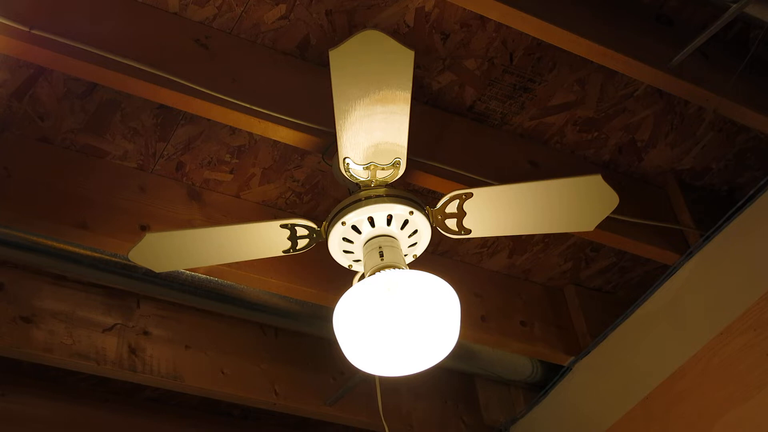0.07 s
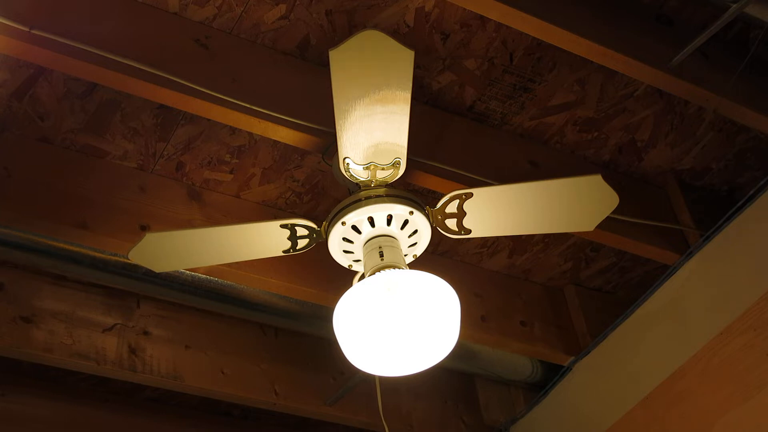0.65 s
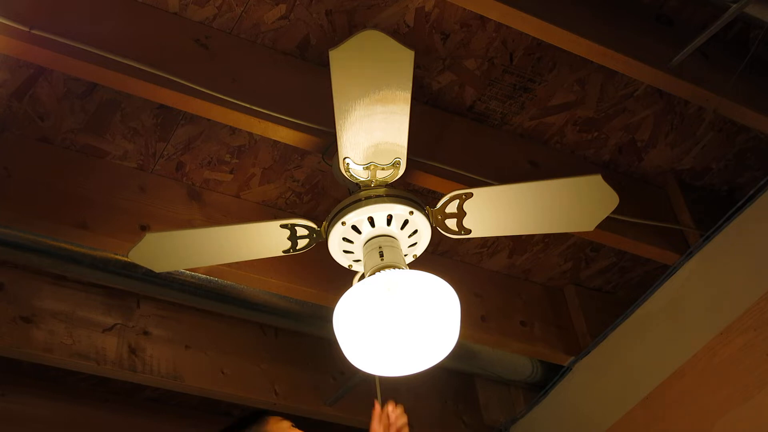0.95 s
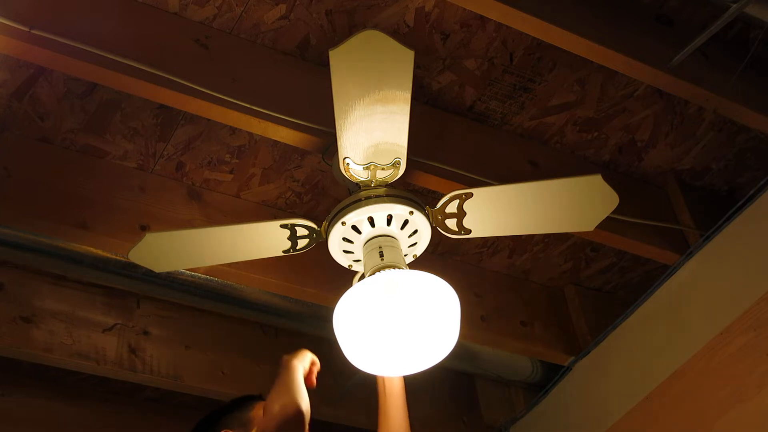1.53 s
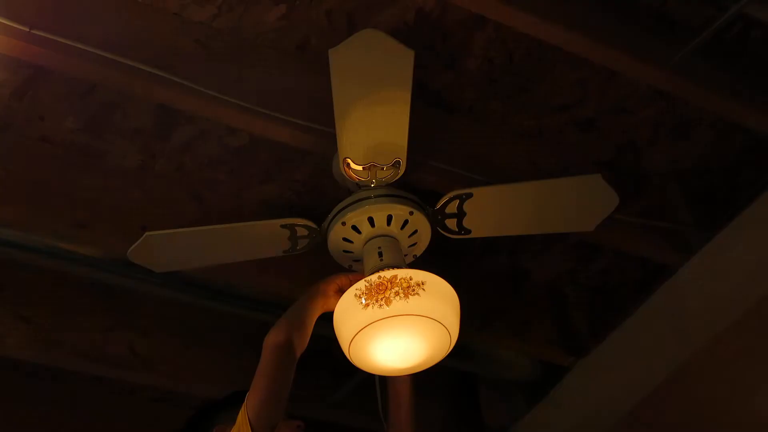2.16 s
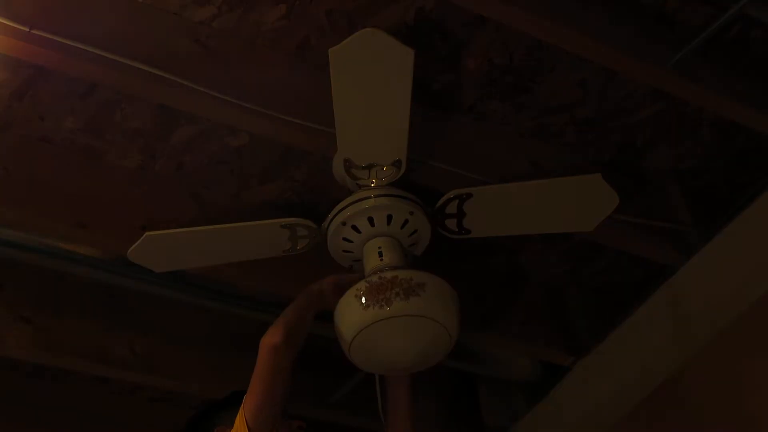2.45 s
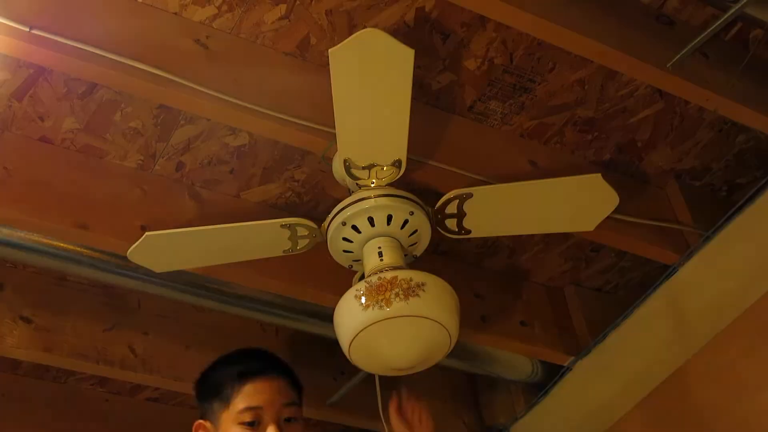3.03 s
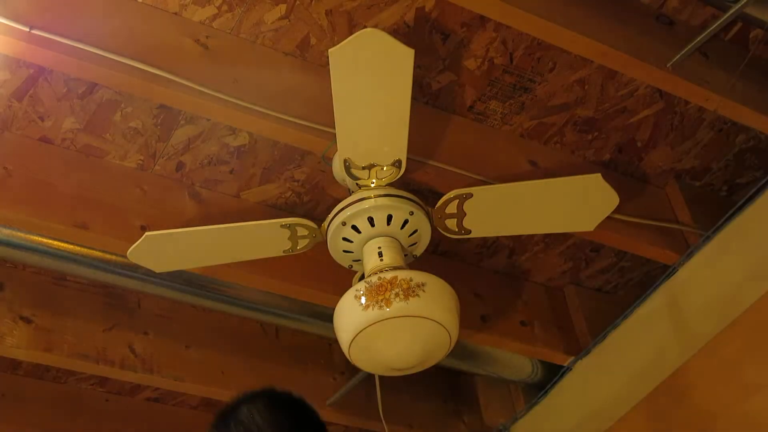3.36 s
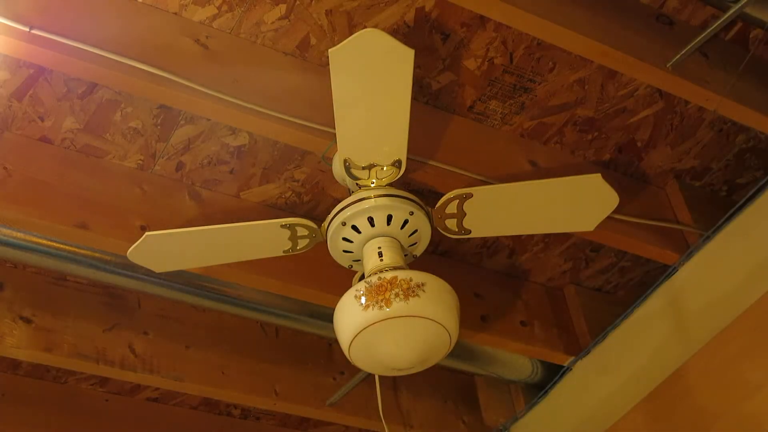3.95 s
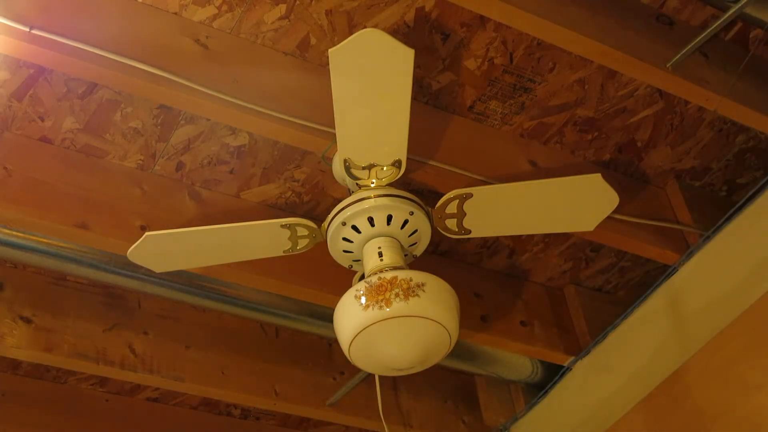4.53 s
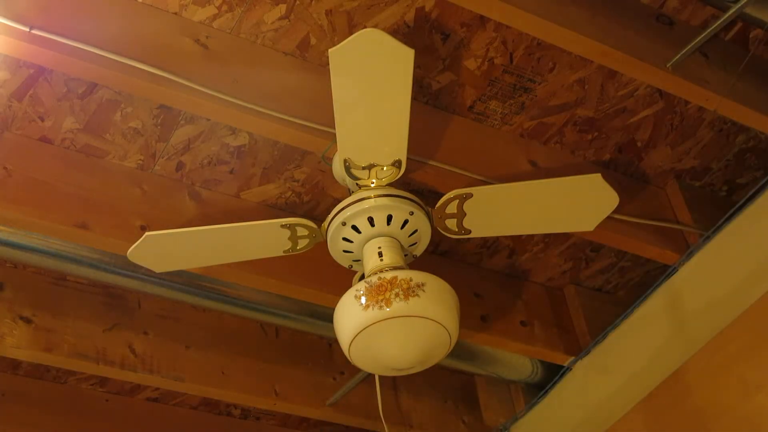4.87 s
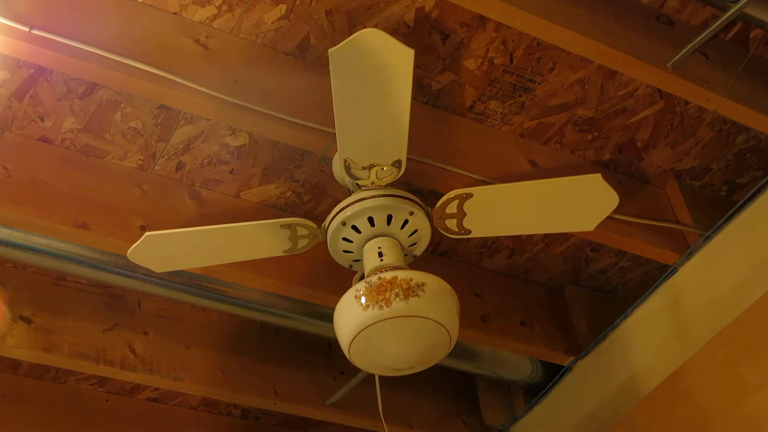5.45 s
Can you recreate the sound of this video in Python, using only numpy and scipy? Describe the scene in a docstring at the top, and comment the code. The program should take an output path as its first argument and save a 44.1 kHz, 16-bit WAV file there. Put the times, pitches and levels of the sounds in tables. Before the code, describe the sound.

In a quiet room, a person moves about with soft floor thumps and rustles of clothes and soles. A bead chain jingles faintly, then the pull switch of a ceiling fan light snaps in and springs back, two sharp clicks with a brief metallic ring. The released chain rattles. More shuffling and dull knocks follow, while a camera lens close to the microphone ticks in quick small steps over low rumble and hiss.

```python
"""Pull-chain switch of a ceiling fan light in a bare-joisted room: it snaps in and springs back,
each contact a crack that rings the metal fitting. The chain rattles as its beads collide.
Before and after, a person moves about: soft knocks boom in the floor, cloth and soles rustle.
The lens iris of a camera close by ticks in small steps. Rumble, air and hiss lie underneath."""
import sys
import numpy as np
from scipy import signal
from scipy.fft import rfft, irfft, next_fast_len
from scipy.io import wavfile
from scipy.ndimage import map_coordinates

SR = 44100
rng = np.random.default_rng(int(sys.argv[2]) if len(sys.argv) > 2 else 0)


def dump_mix(stems):
    """Bounce the given channels to the path in sys.argv[1] as a 16-bit WAV at rate SR."""
    frames = np.atleast_2d(stems).T  # one column per channel
    limited = np.clip(frames, -1, 1)  # hard clip at full scale
    pcm = np.round(limited * 32767).astype(np.int16)
    wavfile.write(sys.argv[1], SR, pcm)


N = 246959
T = np.arange(round(0.6 * SR)) / SR  # time within one event, s

# Levels in all tables are relative.
# background spectra (rumble, air with hiss, antiphase air): f/Hz, level/dB
RUMBLE_SPECTRUM = [(20, -40), (45, -7), (70, -4.5), (100, 1), (150, -2), (275, -1.5), (600, -44)]
AIR_SPECTRUM = [(50, -40), (100, -16.5), (170, -4), (370, 1), (700, -2), (1360, -6), (2000, -7.5),
                (3000, -13), (6000, -12.5), (9000, -17.5), (15800, -22.5)]
WIDE_SPECTRUM = [(50, -60), (140, -26), (250, -8), (450, 0), (900, -2), (1500, -9), (2600, -24),
                 (6000, -50)]
# sliding strokes: t/s, length/s, rub level/dB, hiss level/dB
STROKES = [(.079, 0.043, -46, -59.5), (0.137, .18, -57, -57), (.664, 0.045, -44.5, -52.5),
           (0.906, 0.098, -48, -53), (2.709, 0.058, -51.5, -51.5), (3.201, 0.074, -48, -52.5),
           (3.427, 0.12, -46.5, -48.5), (3.859, 0.15, -49, -46.5), (4.195, 0.057, -43.5, -52),
           (4.245, 0.036, -63, -51), (4.624, 0.038, -51.5, -50), (4.68, 0.074, -54, -57.5),
           (5.093, .02, -49, -56.5)]
# friction spectra: f/Hz, level/dB
RUB_SPECTRUM = [(150, -40), (280, -7), (550, 1.5), (800, 0.5), (1150, -1.5), (1600, -11.5), (2600, -19.5),
                (5000, -72)]
HISS_SPECTRUM = [(800, -29), (1400, -2), (1950, -3), (2800, -10), (4500, -9), (8300, -15.5), (13300, -15),
                 (15500, -23.5)]
# soft blows: t/s, level/dB, f/Hz
BLOWS = [(.086, -36, 560), (.09, -30.5, 187), (.104, -37.5, 95), (.168, -46, 194), (.239, -40, 230),
         (.689, -33.5, 154), (.731, -27, 190), (.816, -36, 174), (.872, -32, 146), (1.201, -37.5, 180),
         (2.146, -37.5, 212), (2.16, -44, 60.6), (2.43, -35, 66), (2.473, -43, 62.6), (3.509, -41, 220),
         (3.735, -43.5, 242), (3.868, -34.5, 415), (4.241, -37.5, 199), (4.689, -29, 204),
         (4.742, -30, 221), (4.79, -32, 232)]
# floor and room under a blow: f/Hz, level/dB
BOOM_SPECTRUM = [(40, -49), (90, -14.5), (150, -10), (215, 5), (265, -5), (320, -12.5), (480, -11),
                 (900, -42)]
# chain shakes: t/s, level/dB, length/s
SHAKES = [(1.514, -53.5, 0.026), (1.868, -56.5, 0.047), (2.01, -53.5, 0.12), (2.085, -45.5, .02),
          (2.377, -51, .15), (2.691, -50, .03), (2.748, -44, 0.028), (2.796, -36.5, .17)]
# bead contact: f/Hz, level/dB
BEAD_SPECTRUM = [(1760, -50), (3000, -16), (3950, -7), (4440, -0.5), (4820, -3), (5200, 4), (6390, 2),
                 (8070, -2), (12400, -6.5), (15500, -10)]
# switch contacts: t/s, level/dB, spring-back share/0-1
CONTACTS = [(1.933, -51, 1), (2.072, -41, 0.2), (2.1399, -19.5, 0.02), (2.423, -49.5, 0.7),
            (2.527, -32.5, 0.6), (2.5353, -22.5, 1)]
# cracks of the pull and the duller spring-back: f/Hz, level/dB
PULL_SPECTRUM = [(150, -35), (330, -19), (700, -17), (1400, -16), (1800, -7.5), (2250, -13), (3000, -8.5),
                 (4500, 0), (5200, -0.5), (6400, 4.5), (8100, -6), (10500, -4.5), (12800, -3), (15500, -22)]
BACK_SPECTRUM = [(150, -28), (450, -10.5), (800, -17.5), (1050, -10.5), (1400, -11), (1850, 1.5),
                 (2350, -12), (2950, -6.5), (4200, -8.5), (6000, -7.5), (8600, -10), (11500, -16),
                 (13300, -12), (15500, -20)]
# modes of switch and fitting: f/Hz, pull level/dB, spring-back level/dB
METAL_MODES = [(1702, -19, -8), (1732, -21, -16), (1816, -12, -26), (1872, -30, -11), (2270, -41, -21),
               (2497, -19, -35), (2671, -20, -12), (2705, -26, -14), (3081, -24, -12), (4148, -19, -27),
               (4356, -18, -36), (4496, -16, -38), (4531, -12, -38), (5064, -15, -21), (5420, -15, -36),
               (5642, -13, -35), (5678, -16, -33), (5996, -18, -24), (6028, -10, -35), (6203, -10, -40),
               (6284, -17, -41), (6568, -15, -20), (6639, -12, -31), (10057, -21, -31), (10387, -19, -30),
               (10532, -18, -39), (11750, -20, -37), (12567, -20, -39)]
# decay of metal and room: f/Hz, t60/s
METAL_T60 = [(1800, 0.46), (3000, 0.29), (6500, .35), (12000, 0.35)]
ROOM_T60 = [(300, 0.33), (1500, 0.31), (3500, 0.38), (6500, 0.33), (10000, .32), (15000, 0.26)]
# lens barrel: f/Hz, level/dB
BARREL_SPECTRUM = [(600, -55), (1100, -2), (1340, 8), (1650, -3.5), (2000, -12), (2400, -3), (3000, -13),
                   (8000, -28.5)]
# stereo balance of air, person and fan: f/Hz, left minus right/dB
AIR_BALANCE = [(200, -1.5), (1000, 0), (5000, 2), (14000, 4)]
PERSON_BALANCE = [(150, -2), (400, -4), (800, -2), (1400, 9), (2400, 14), (5000, 11.5), (14000, 32)]
FAN_BALANCE = [(110, 0), (380, -7), (700, 5.5), (1290, 7.5), (2380, 9), (4400, 12.5), (8120, 23),
               (15000, 34)]
# left-right likeness of the same: f/Hz, coherence/0-1
AIR_COHERENCE = [(100, .998), (230, .95), (420, .3), (700, .25), (1500, .45), (2600, .15), (12000, .15)]
PERSON_COHERENCE = [(180, .98), (280, .85), (450, .3), (900, .6), (2000, .75), (12000, .7)]
FAN_COHERENCE = [(130, 0.71), (320, 0.32), (600, 0.96), (1800, 0.98), (4000, 0.89), (12000, .75)]
# right channel behind left: f/Hz, phase/rad
RIGHT_LAG = [(250, 0), (520, 2.5), (1150, 3.1), (1800, 3.7), (3500, 5), (5500, 6), (10000, 6.3)]

WIDE_SWELL = dict(start_s=0.1, attack_s=1.06, end_s=2.84, release_s=0.89)  # stereo image widens


def amp(db):
    """Decibels to gain."""
    return 10 ** (np.asarray(db) / 20)


def unit(x):
    """Scale to rms 1."""
    return x / np.sqrt(np.mean(x ** 2) + 1e-20)


def along(points, hz):
    """Interpolate (f/Hz, value) points on a log axis."""
    f, v = np.transpose(points)
    return np.interp(np.log(hz + 1), np.log(f + 1), v)


def wobble(rate_hz):
    """Smooth random curve over one event."""
    knots = rng.standard_normal(int(len(T) * rate_hz / SR) + 4)
    return map_coordinates(knots, [T * rate_hz])


def plateau(start_s, attack_s, end_s, release_s):
    """Trapezoid control, 0 to 1 and back."""
    t = np.arange(N) / SR
    return np.clip((t - start_s) / attack_s, 0, 1) - np.clip((t - end_s) / release_s, 0, 1)


def filtered(x, response):
    """Apply a frequency response."""
    n = x.shape[-1]
    m = next_fast_len(n + 4096)
    return irfft(rfft(x, m) * response(np.fft.rfftfreq(m, 1 / SR)), m)[..., :n]


def lowpass(x, edge_hz):
    """Zero phase, 24 dB/octave."""
    return filtered(x, lambda hz: 1 / (1 + (hz / edge_hz) ** 4))


def ripple(x, spacing_hz, depth_db):
    """Close resonances: random narrow peaks and dips at equal power."""
    knots = rng.standard_normal(int(SR / spacing_hz))
    return filtered(x, lambda hz: unit(amp(depth_db * map_coordinates(knots, [hz / spacing_hz]))))


def add(track, at_s, sound):
    """Mix a sound into a track."""
    part = track[..., round(at_s * SR):][..., :sound.shape[-1]]
    part += sound[..., :part.shape[-1]]


def mono_noise(spectrum):
    """Coloured noise, rms 1."""
    return unit(filtered(rng.standard_normal(N), lambda hz: amp(along(spectrum, hz))))


def stereo_noise(spectrum, balance, coherence, size=N):
    """Coloured, partly coherent noise pair, mid rms 1."""
    def mixing(hz):
        likeness = np.clip(along(coherence, hz), 0, 0.998)
        right = amp(-along(balance, hz))
        shared = right * likeness * np.exp(-1j * along(RIGHT_LAG, hz))
        own = right * np.sqrt(1 - likeness ** 2)
        mid = np.sqrt(abs(1 + shared) ** 2 + own ** 2)
        matrix = np.array([[np.ones_like(hz), np.zeros_like(hz)], [shared, own]])
        return matrix * amp(along(spectrum, hz)) / mid
    pair = filtered(rng.standard_normal((2, size)), mixing).sum(axis=1)
    return pair / np.std(pair.mean(axis=0))


def room_tone():
    """Rumble that dips for a while, air that widens and narrows, steady hiss."""
    rumble = lowpass(stereo_noise(RUMBLE_SPECTRUM, AIR_BALANCE, AIR_COHERENCE), edge_hz=300)
    rumble_db = -55.5 - 27 * plateau(start_s=2.5, attack_s=0.42, end_s=4.6, release_s=0.47)
    steady = stereo_noise(AIR_SPECTRUM, AIR_BALANCE, AIR_COHERENCE)
    air = lowpass(steady, edge_hz=1800)
    hiss = steady - air
    wide = mono_noise(WIDE_SPECTRUM) * np.array([[1], [-1]])
    wide_db = -66.5 + 17.5 * plateau(**WIDE_SWELL)
    return amp(rumble_db) * rumble + amp(wide_db) * wide + amp(-54) * air + amp(-55) * hiss


def stroke(length_s, rise_share=0.49, t60_s=0.37):
    """Envelope of a slide: swell, hold, room decay."""
    swell = np.minimum(T / (rise_share * length_s), 1)
    return swell * amp(-60 * np.maximum(T - length_s, 0) / t60_s)


def rustles(hiss_stretch=1.186):
    """Cloth and soles slide: a dull grainy rub and a longer hiss, coloured by near walls."""
    out = np.zeros((2, N))
    rub = stereo_noise(RUB_SPECTRUM, PERSON_BALANCE, PERSON_COHERENCE, size=N + len(T))
    hiss = stereo_noise(HISS_SPECTRUM, PERSON_BALANCE, PERSON_COHERENCE, size=N + len(T))
    for at_s, length_s, rub_db, hiss_db in STROKES:
        now = slice(round(at_s * SR), round(at_s * SR) + len(T))
        grain = unit(amp(0.54 * wobble(rate_hz=355.4) + 0.58 * wobble(rate_hz=47)))
        sliding = amp(rub_db) * stroke(length_s) * rub[:, now]
        sliding += amp(hiss_db) * stroke(hiss_stretch * length_s) * hiss[:, now]
        add(out, at_s, ripple(grain * sliding, spacing_hz=60.4, depth_db=2.5))
    return out


def knocks(floor_hz=222, boom_t60_s=0.5, boom_rise_s=0.01):
    """A soft blow pushes for 2-3 cycles; the floor booms, most for blows near its own pitch."""
    pushes, boom_power = np.zeros(N), np.zeros(N)
    for at_s, db, hz in BLOWS:
        progress = T * hz / 1.23  # envelope peaks at 1.23 cycles
        phase = 2 * np.pi * hz * T
        flex = -progress ** 2 * np.exp(2 * (1 - progress)) * np.cos(phase)
        add(pushes, at_s, amp(db - 3.5) * np.gradient(flex, phase[1]))
        boom_db = db - 8.5 - 11.5 * abs(np.log2(hz / floor_hz))
        envelope = amp(boom_db - 60 * T / boom_t60_s) * (1 - np.exp(-T / boom_rise_s))
        add(boom_power, at_s, envelope ** 2)
    return pushes + np.sqrt(boom_power) * stereo_noise(BOOM_SPECTRUM, PERSON_BALANCE, PERSON_COHERENCE)


def echoes(spectrum):
    """Dense room reflections of a click at the fan, each band with its own decay."""
    reflections = stereo_noise(spectrum, FAN_BALANCE, FAN_COHERENCE, size=len(T))
    hz, t, bands = signal.stft(reflections, SR, nperseg=256)
    decay = amp(-60 * t / along(ROOM_T60, hz)[:, None])
    return signal.istft(bands * decay, SR, nperseg=256)[1][:, :len(T)]


def chain(count=28, swell_share=0.15, settle_db=6, scatter_db=1.9):
    """Each shake is a shower of bead contacts that swells and settles, at its own close pitches."""
    out = np.zeros((2, N))
    reflections = echoes(BEAD_SPECTRUM)
    direct_boost = 1 + 3 * np.exp(-T / 0.00034)
    for at_s, db, length_s in SHAKES:
        progress = (np.arange(count) + rng.random(count)) / count
        swell = np.minimum(progress / swell_share, 1)
        sizes = unit(swell * amp(scatter_db * rng.standard_normal(count) - settle_db * progress))
        impulses = np.zeros(len(T))
        impulses[(length_s * progress * SR).astype(int)] = amp(db + 2) * sizes / np.sqrt(count)
        bead = ripple(reflections, spacing_hz=70.7, depth_db=3) * direct_boost
        add(out, at_s, signal.fftconvolve(impulses[None], bead, axes=1))
    return out


def metal_ring(modes, waver_rad, swell_s):
    """Metal modes (f/Hz, level/dB) build up in the room and decay with wandering phase."""
    out = np.zeros((2, len(T)))
    for hz, db in modes:
        phase = 2 * np.pi * (hz * T + rng.random()) + waver_rad * wobble(rate_hz=59)
        right = amp(-along(FAN_BALANCE, hz)) * np.sin(phase - along(RIGHT_LAG, hz))
        out += amp(db - 60 * T / along(METAL_T60, hz)) * np.array([np.sin(phase), right])
    return out * (1 - np.exp(-T / swell_s))


def switch(rise_s=0.0011):
    """Each contact cracks, echoes and rings the metal around it."""
    out = np.zeros((2, N))
    pull_ring = metal_ring([(hz, db) for hz, db, _ in METAL_MODES], waver_rad=0.69, swell_s=0.0092)
    back_ring = metal_ring([(hz, db) for hz, _, db in METAL_MODES], waver_rad=0.55, swell_s=0.009)
    attack = 1 - np.exp(-T / rise_s)
    for at_s, db, back_share in CONTACTS:
        pull = echoes(PULL_SPECTRUM) + amp(6) * pull_ring
        back = echoes(BACK_SPECTRUM) + amp(9) * back_ring
        snap = np.sqrt(1 - back_share) * pull + np.sqrt(back_share) * back
        clumps = amp(0.77 * wobble(rate_hz=900))  # reflections arrive unevenly
        add(out, at_s, amp(db) * attack * clumps * snap)
    return out


def iris(count=22, start_s=3.147, step_s=0.0835, rise_s=0.0011, t60_s=0.078):
    """Each iris step starts and stops with a tick, carried by the camera body mostly to the right."""
    ticks = np.zeros(N)
    tick = amp(-60 * T / t60_s) * (1 - np.exp(-T / rise_s))
    for step, (size, lateness) in enumerate(rng.standard_normal((count, 2))):
        travel = 2 * step / (count - 1) - 1
        db = -39.5 - 4.5 * travel ** 2 + 2 * size  # softer at both ends of the travel
        at_s = start_s + step * step_s
        move_s = 0.017 + 0.0044 * lateness
        add(ticks, at_s, amp(db) * tick)
        add(ticks, at_s + move_s, amp(db - 4) * tick)
    return ticks * mono_noise(BARREL_SPECTRUM) * np.array([[-0.3], [1]])


def scene():
    """Stereo sum of all sources."""
    return switch() + chain() + knocks() + rustles() + iris() + room_tone()


def record(dry, top_hz=15830):
    """Mono bass, its edge lower while the image is wide; hard band limit."""
    side = (dry[0] - dry[1]) / 2
    narrow, wide = lowpass(side, edge_hz=356), lowpass(side, edge_hz=117)
    bass_side = narrow + plateau(**WIDE_SWELL) * (wide - narrow)
    return filtered(dry - np.array([bass_side, -bass_side]), lambda hz: hz < top_hz)


dry = scene()
out = record(dry)
dump_mix(out)
```